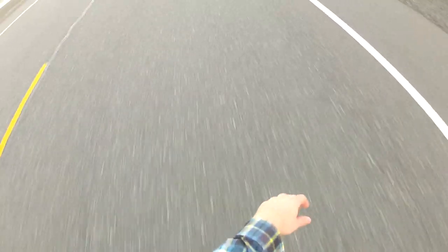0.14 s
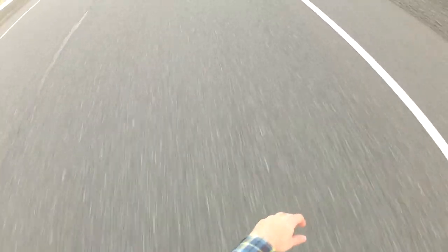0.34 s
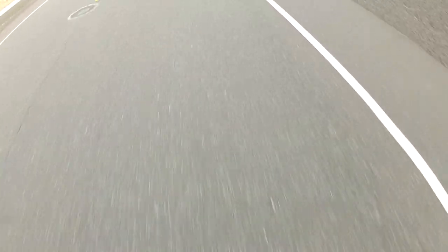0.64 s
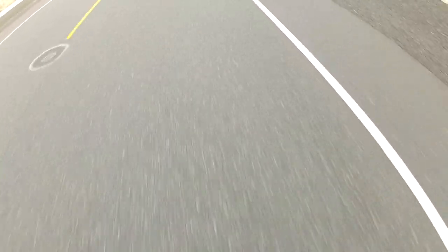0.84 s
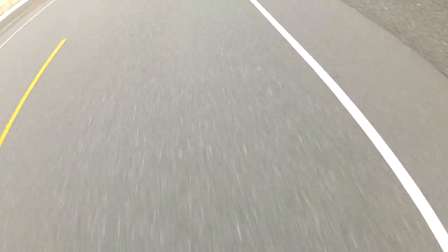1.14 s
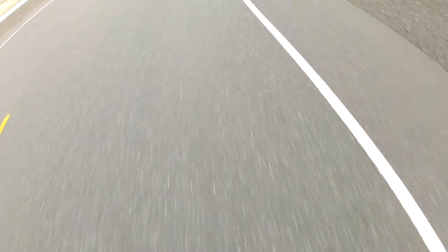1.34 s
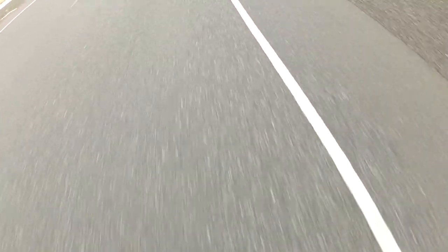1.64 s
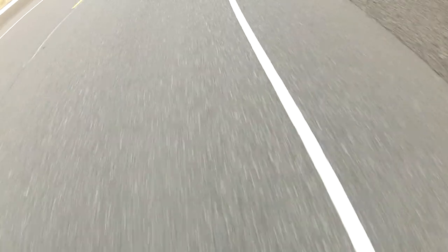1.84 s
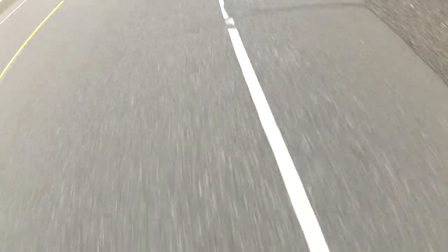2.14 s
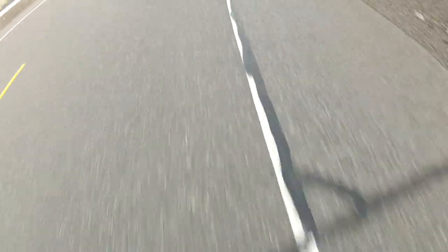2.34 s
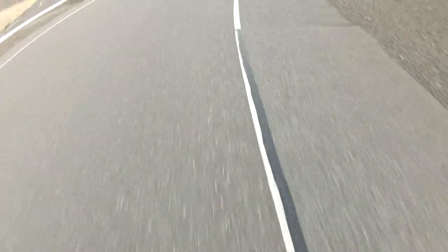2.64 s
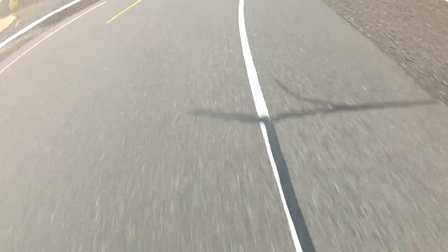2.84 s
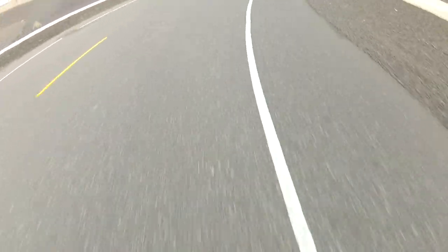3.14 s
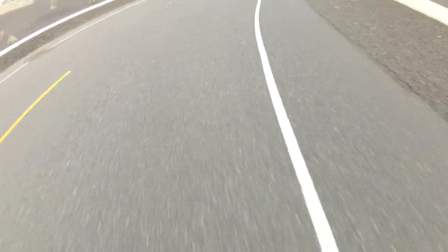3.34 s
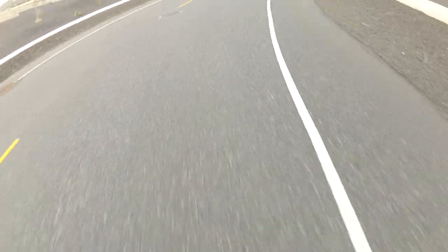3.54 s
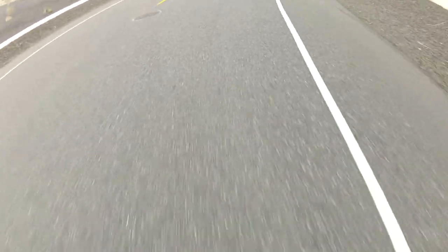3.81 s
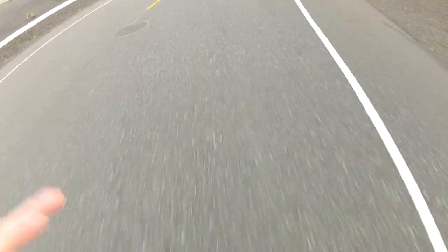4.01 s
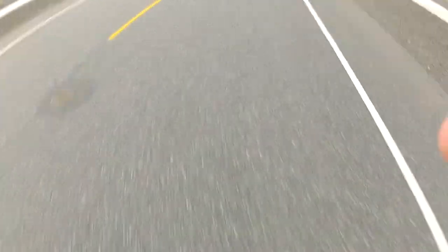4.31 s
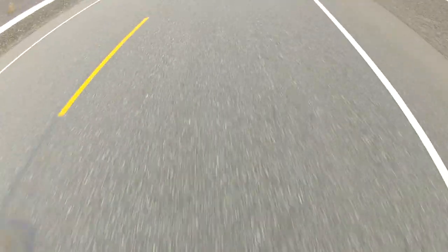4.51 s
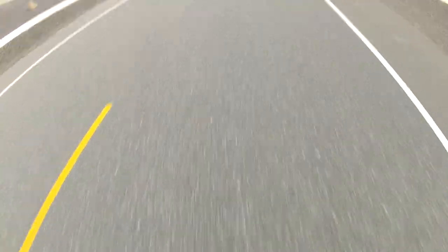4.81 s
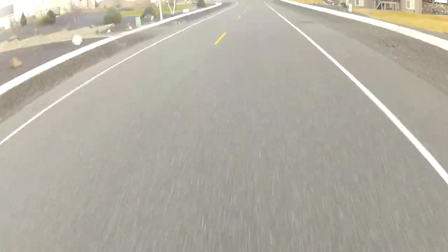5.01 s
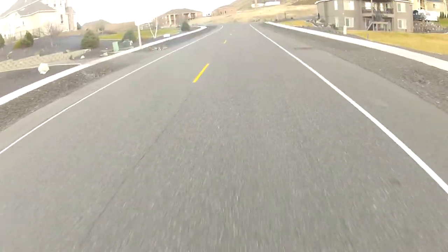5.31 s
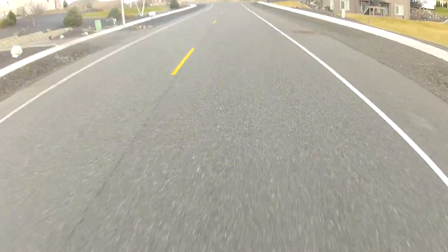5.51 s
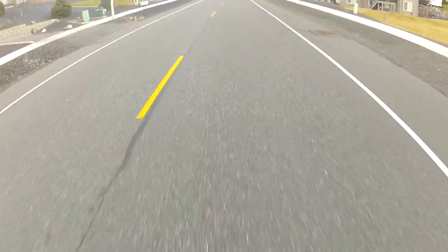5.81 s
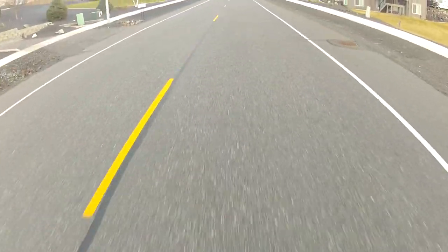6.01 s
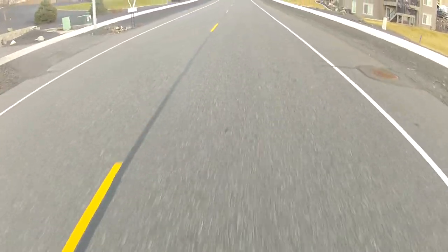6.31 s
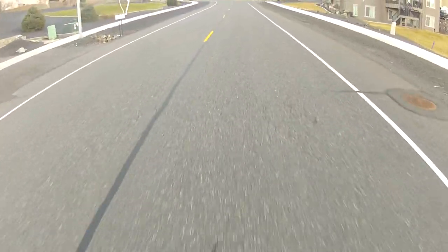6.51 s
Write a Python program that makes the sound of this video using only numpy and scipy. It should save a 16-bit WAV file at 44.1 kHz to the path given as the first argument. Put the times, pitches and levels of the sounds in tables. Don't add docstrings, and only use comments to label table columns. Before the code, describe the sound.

Heard from a small enclosed microphone carried by the rider on an open road: continuous rumbling wheels, grainy hiss and scattered dull knocks as stones hit. Later come low wind puffs and a rough roar, with sharp plastic cracks, rattles and hollow case knocks, each overload briefly pushing the rumble down. A last hard knock gives way to steadier rolling with very faint bearing squeal. The sound is boxy, distorted and low fidelity.

```python
import sys
import numpy as np
from scipy import signal
from scipy.fft import rfft, irfft
from scipy.io import wavfile
from scipy.ndimage import uniform_filter1d

SR = 44100
rng = np.random.default_rng(int(sys.argv[2]) if len(sys.argv) > 2 else 0)


def level_to_linear(level):
    exponent = np.asarray(level, float) / 20
    return 10 ** exponent


def unload_audio(sound):
    columns = np.transpose(np.atleast_2d(sound))
    steps = np.round(np.clip(columns, -1, 1) * 32767)
    wavfile.write(sys.argv[1], SR, steps.astype(np.int16))


N = 293706
T = np.arange(N) / SR


def evened(x):
    return x / np.sqrt(np.mean(x ** 2) + 1e-20)


def coloured(x, points):
    f, db = np.transpose(points)
    hz = abs(np.fft.fftfreq(8192, 1 / SR))
    curve_db = np.interp(np.log(hz + 1), np.log(f + 1), db, db[0] - 25, db[-1] - 40)
    log_gain = np.log(level_to_linear(curve_db))
    taps = np.fft.ifft(np.exp(signal.hilbert(log_gain).conj())).real[:4096]
    return evened(irfft(rfft(x) * rfft(taps, len(x)), len(x)))


def resonate(x, hz, width_hz):
    turn = np.exp(2j * np.pi * np.cumsum(hz * np.ones(len(x))) / SR)
    r = np.exp(-np.pi * width_hz / SR)
    smooth = signal.lfilter([1 - r], [1, -r], x / turn)
    return 2 * (turn * smooth).real


def flicker(low_hz, top_hz):
    rates = np.geomspace(low_hz, top_hz, num=20)
    return evened(sum(np.sin(2 * np.pi * (f * T + rng.random())) for f in rates))


def stones(per_s, spread_db):
    size = level_to_linear(spread_db * np.minimum(rng.exponential(1, N), 5))
    sign = rng.choice([-1., 1.], N)
    return size * sign * (rng.random(N) < per_s / SR)


def swells(table, rise_s, fall_s):
    power = np.zeros(N)
    for s, length, db in table:
        before, after = np.maximum(s - T, 0), np.maximum(T - s - length, 0)
        power += level_to_linear(db - 10 * before / rise_s - 10 * after / fall_s) ** 2
    return power


def add_ring(sound, s, db, hz, rise_s, t60_s):
    t, at = np.arange(SR // 20) / SR, round(s * SR)
    envelope = level_to_linear(db - 60 * t / t60_s) * np.minimum(t / rise_s, 1)
    sound[at:at + len(t)] += envelope * np.sin(2 * np.pi * hz * t)


def gusts():
    # start in seconds, length in seconds, level in dB.
    gust_rows = [(.09, 0.11, -22.5), (.63, .2, -18.5), (.97, 0.051, -21.5), (1.27, 0.027, -27),
                 (1.75, 0.42, -27.5), (2.29, .04, -26), (2.62, 0.077, -25), (3.88, 0.073, -27.5),
                 (4.43, 1, -16), (4.91, .04, -12.5), (5.045, 0.0096, -6), (5.25, .3, -7.5),
                 (5.57, 0.23, -7.5), (5.86, 0.095, -17.5), (6.37, .03, -24.5)]
    breeze = level_to_linear(-27 - 1.18 * T)
    return np.sqrt(breeze ** 2 + swells(gust_rows, rise_s=0.064, fall_s=0.049))


def ducking():
    knee_db, smooth_s = -17.5, 0.23
    wind_db = uniform_filter1d(20 * np.log10(gusts()), round(smooth_s * SR))
    return level_to_linear(-np.maximum(wind_db - knee_db, 0))


def wheels(lift):
    # frequency in Hz, level in dB.
    drum_spectrum = [(15, -21.5), (25, -12), (119, -18.5), (248, -10.5), (338, -4.5), (388, -3.5), (546, 0),
                     (637, -5), (730, -17), (928, -33.5), (1060, -44), (1500, -42.5), (1950, -56),
                     (3300, -120)]
    hiss_spectrum = [(530, -26.5), (900, -3), (1060, -17.5), (1380, -12), (1580, -29.5), (1850, -15),
                     (2280, -12), (3550, -15.5), (4620, -29.5), (5120, -31), (6000, -30), (7800, -80),
                     (13200, -120)]
    fizz_spectrum = [(1940, -24), (3300, -6.5), (3780, -7), (4470, -2.5), (4990, -3), (5580, -11.5),
                     (6000, -9), (7800, -62), (13200, -120)]
    # time in seconds, load on the wheels in dB, coarseness of the asphalt in dB.
    road = [(0, -13, 4.5), (.12, -15, 1.5), (.45, -15.5, -2), (.72, -16, -2), (1.3, -17, 0.5),
            (1.75, -16.5, 1.5), (2.1, -15, 1.5), (2.45, -14.5, 3.5), (2.7, -15.5, 1.5), (3.0, -13.5, 3.5),
            (3.4, -15, 1), (4.15, -17.5, 1), (4.36, -16, 3.5), (4.9, -15, 5.5), (5.6, -14.5, 0),
            (5.9, -15.5, -0.5), (6.15, -17, -1), (6.66, -16, 0)]
    # start in seconds, length in seconds, level in dB.
    seams = [
        (1.975, 0.13, -48),
        (2.0, .04, -48.5),
        (5.75, .04, -51),
        (5.91, 0.018, -55),
        (6.17, 0.083, -54.5),
    ]
    at, load_db, coarse_db = np.transpose(road)
    load, coarse = level_to_linear(np.interp(T, at, load_db)), level_to_linear(np.interp(T, at, coarse_db))
    duck, patches = ducking(), flicker(7.2, 90)

    drum = lift * coloured(stones(2500, 1.6) * level_to_linear(0.32 * patches), drum_spectrum)
    hiss_kicks = stones(9000, 2.8) * level_to_linear(0.31 * patches + 0.58 * flicker(6.1, 120))
    hiss = coloured(hiss_kicks, hiss_spectrum)
    fizz = coloured(stones(9000, 3.8) * level_to_linear(0.73 * flicker(5.1, 110)), fizz_spectrum)

    steady_grit = level_to_linear(-57.5) * coarse ** 0.28 * duck ** 1.5
    grit = np.sqrt(steady_grit ** 2 + swells(seams, rise_s=.04, fall_s=.025))
    tread = level_to_linear(3.5 - 48.5) * coarse * duck ** 0.17 * hiss + level_to_linear(6.5) * grit * fizz
    return level_to_linear(-0.71) * load * duck ** 0.37 * drum + tread


def jolts():
    # start in seconds, peak in dB, ring in Hz.
    large_stones = [(0.093, -10, 653), (0.459, -11.5, 652), (0.734, -9.5, 507), (1.618, -2, 570),
                    (2.097, -2.5, 532), (2.139, -11, 500), (2.344, -4, 510), (2.397, -5.5, 594),
                    (2.472, -6, 574), (2.929, -4.5, 560), (3.01, -1.5, 578), (3.243, -1.5, 540),
                    (3.486, -5, 513), (3.528, 2, 468), (5.336, -11, 450), (5.606, -6, 624),
                    (6.014, -35, 517), (6.572, -10, 610)]
    sound, lift_db = np.zeros(N), np.zeros(N)
    for s, db, hz in large_stones:
        add_ring(sound, s, db - 1.5, hz, rise_s=0.0017, t60_s=0.029)
        at = round(s * SR)
        lift_db[at - 600:at + 200] += 12 * np.hanning(800)
    return sound, level_to_linear(-lift_db)


def deck():
    grow_db, grow_s = 20, 2.5
    head_up_db, head_up_s = -4, 4.62
    db = -38.5 - grow_db * np.clip(1 - T / grow_s, 0, 1)
    db = db + head_up_db * np.clip((T - head_up_s) / .15, 0, 1)
    ring = resonate(resonate(stones(4000, 1.2), 740, 350), 740, 350)
    return level_to_linear(db - 1.5) / ducking() ** .1 * evened(ring)


def wind():
    # frequency in Hz, level in dB.
    buffet_spectrum = [(26, -39.5), (45, 1), (113, 1), (249, -2.5), (378, -10), (425, -10.5), (471, -16.5),
                       (509, -29.5), (1000, -44.5), (1300, -45.5), (2200, -120)]
    roar_spectrum = [(470, -48.5), (800, 3), (888, -5.5), (2860, -16), (3650, -51), (4210, -48),
                     (5500, -24), (7150, -72), (12100, -120)]
    gust = gusts()
    buffet = coloured(rng.standard_normal(N) * level_to_linear(1.53 * flicker(6, 40)), buffet_spectrum)
    limiter = (uniform_filter1d(buffet ** 2, size=1200) + .15) ** 0.2
    grain = stones(3000, 4.) * level_to_linear(2.5 * flicker(10, 100))
    roar = level_to_linear(-24) * gust ** 2 * coloured(grain, roar_spectrum)
    return gust * evened(buffet / limiter) + roar


def puffs():
    # start in seconds, peak in dB, swing in Hz.
    puff_rows = [
        (4.509, -4.5, 78.6),
        (4.685, -4.5, 117),
        (4.911, -3, 137),
        (5.036, 3, 113),
        (5.122, -16, 105),
        (5.337, -4, 119.5),
        (5.55, -3.5, 186),
    ]
    sound = np.zeros(N)
    for s, db, hz in puff_rows:
        bell = np.exp(-((T - s - .012) / 0.0072) ** 2)
        sound += level_to_linear(db + 1.5) * np.sin(2 * np.pi * hz * (T - s)) * bell
    return sound


def rattles():
    # start in seconds, peak in dB, ring in Hz, length in
    # ms, hardness in dB.
    ticks = [(4.3058, -9, 3900, 3.05, 2), (4.521, -18.5, 3030, 4.1, -4), (4.573, -18.5, 1940, 2.4, -9),
             (4.5897, -8.5, 2680, 1.6, -8), (4.6152, -23, 1740, 1.6, -2), (4.8186, -20.5, 1440, 2, 7),
             (4.8434, -25.5, 2180, 2.4, -6), (5.006, -23, 1950, 1.6, -2), (5.013, -7.5, 2440, 3.3, 0),
             (5.042, -16.5, 1770, 2.2, 9), (5.0714, -17, 3030, 1.4, 11), (5.0879, -24, 1500, 5, 0),
             (5.1037, -5, 3200, 1.3, 18.5), (5.15, 0, 2010, 2.25, 5.5), (5.2014, -17, 2930, 2.7, 6),
             (5.2118, -5, 3340, 1.13, 15),
             (5.354, -29, 1570, 1.8, -27), (5.3753, -31, 1620, 2.6, -11), (5.414, -44, 1560, 2.3, -4),
              (5.436, -27, 1640, 3.2, -22), (5.481, -34, 1510, 3.6, -13), (5.4987, -39, 1600, 2.9, -5),
              (5.553, -30, 1500, 2, -7), (5.5804, -30, 1550, 1.8, 1), (5.6042, -31.5, 2100, 5, -25),
              (5.617, -18, 1800, 1.2, 18), (5.66, -30.5, 2020, 3.2, -20), (5.6928, -14, 3280, 2.1, -9),
              (5.706, -24, 2800, 4, -7), (5.759, -25, 1650, 3.1, -4), (5.7767, -10.5, 3860, 1.8, 3)]
    rubs = [
        (4.4039, -13.5, 3230, 32, -1),
        (4.362, -31, 3300, 24, 6),
        (4.4035, -8.5, 3180, 5.1, 2),
        (4.436, -24.5, 1600, 12, -7),
        (4.65, -19, 1930, 9.7, -4.5),
        (4.948, -9.5, 1910, 7.2, 1),
        (4.964, -5, 3370, 8.3, 2),
    ]
    blows = [
        (4.7249, -3, 2470, 5.6, 9.5),
        (5.796, -14.5, 2800, 2.7, -15),
    ]
    grit = [
        (1.943, -33, 2740, 4.2, 8),
        (2.0346, -29.5, 3100, 3.5, 11),
        (5.914, -33, 4600, 3.2, 16),
        (5.925, -30, 4300, 2, 12),
        (6.018, -38, 2900, 6.8, 4.3),
        (6.5476, -51, 3100, 4.7, 2.2),
        (0, -20, 4200, 1.2, 15),
    ]
    # frequency in Hz, level in dB.
    case_spectrum = [(710, -9), (1200, -23.5), (2240, 19.5), (2730, 1.5), (3120, 3), (3850, -5),
                     (4460, -26), (4900, 21), (6000, 5.5), (7800, -47), (13200, -120)]
    # frequency in Hz, width in Hz, level in dB.
    case_modes = [(1106, 98, -10), (1726, 140, 6), (2800, 270, 4), (3270, 210, 2.5), (3690, 110, 2.5),
                  (4900, 76, -23)]
    sound, t = np.zeros(N), np.arange(SR // 10) / SR
    case = np.zeros(len(t))
    for k, (f, width, db) in enumerate(case_modes):
        case += (-1) ** k * level_to_linear(db) * evened(resonate(t == 0, f, width))

    for s, db, hz, ms, hard_db in ticks + rubs + blows + grit:
        release = np.maximum(t - ms / 1000, 0)
        shape = np.minimum(t / 0.00044, 1) * level_to_linear(-80 * t - 60 * release / 0.0046)
        shape = shape + 0.0034 * signal.lfilter([1], [1, -.985], shape)
        noise = rng.standard_normal(len(t))
        modes = irfft(rfft(noise) * rfft(case), len(t))
        body = .5 * coloured(noise, case_spectrum) + 1.38 * evened(modes)
        ring = resonate(resonate(noise, hz, 1400), hz, 1400)
        edge = resonate(resonate(noise[::-1], 3500, 2400), 3500, 2400)
        thump = resonate(resonate(noise, 1025, 770), 1025, 770)
        hit = .55 * evened(body * shape) + .95 * evened(ring * shape)
        hit = hit + level_to_linear(-13.5 + hard_db) * evened(edge * shape)
        hit = hit + level_to_linear(-2 - 0.67 * hard_db) * evened(thump * shape)
        hit = hit * np.sqrt(np.mean(shape ** 2))
        at = round(s * SR)
        sound[at:at + len(t)] += level_to_linear(db - 9) * hit[:N - at]
    return sound


def knocks():
    # start in seconds, peak in dB, ring in Hz.
    hollow = [
        (5.015, -6, 820),
        (5.15, -10.5, 950),
        (5.797, -1, 845),
        (5.797, -5, 1050),
    ]
    cracks = [(4.3068, 1, 1950), (4.5892, -7, 2680), (4.7256, -0.5, 2620), (4.7292, -4, 3100),
              (4.727, -5, 1500), (4.9646, -4, 3530), (4.9646, -5, 1950), (5.104, -9, 2050),
              (5.7765, -12, 3900), (5.212, -6, 3900), (5.071, -24, 3270), (5.103, 3.5, 3200),
              (5.1514, -3, 1920), (5.151, -4, 4060), (5.1512, -6, 2970), (5.2132, 0.5, 3220),
              (5.6166, -15, 3870), (5.7064, -9.5, 2950), (5.7763, -22, 1900)]
    sound = np.zeros(N)
    for s, db, hz in hollow:
        add_ring(sound, s, db + 3, hz, rise_s=.0025, t60_s=.022)
    for s, db, hz in cracks:
        add_ring(sound, s, db - 5, hz, rise_s=.0006, t60_s=.012)
    return sound


def squeal():
    # start in seconds, length in seconds, level in dB.
    squeals = [
        (5.808, .012, -39.5),
        (5.905, .03, -50),
        (5.96, 0.088, -47.5),
        (6.51, .13, -47),
    ]
    high_hz, low_hz = 4850, 3030
    slide_s, slide_length_s = 5.89, .11
    slide = np.clip((T - slide_s) / slide_length_s, 0, 1)
    smear = np.exp(-((T - slide_s - slide_length_s / 2) / slide_length_s) ** 2)
    width_hz = 240 + 400 * smear
    wobble = evened(uniform_filter1d(rng.standard_normal(N), size=60))
    pitch_hz = high_hz + (low_hz - high_hz) * slide + 0.58 * width_hz * wobble
    tone = np.sin(2 * np.pi * np.cumsum(pitch_hz) / SR)
    return tone * np.sqrt(swells(squeals, rise_s=.03, fall_s=.02))


def gain_control():
    # start in seconds, drop in dB.
    dips = [
        (4.735, 17),
        (4.975, 7),
        (5.019, 5.5),
        (5.153, 8.5),
        (5.215, 8.5),
        (5.804, 11),
    ]
    drop_db = np.zeros(N)
    for s, db in dips:
        drop_db += db * np.clip((T - s) / 0.0028, 0, 1) * np.exp(-abs(T - s) / 0.055)
    return level_to_linear(-drop_db)


def scene():
    rings, lift = jolts()
    steady = wheels(lift) + rings + deck() + wind() + puffs() + squeal()
    hits = rattles() + knocks()
    return (gain_control() * steady + hits)[None]


def top_cut(x):
    return signal.sosfilt(signal.butter(12, 16500, fs=SR, output="sos"), x)


def record(dry):
    hold_hz, edge_hz = 12000, 15350
    hz = np.fft.rfftfreq(N, 1 / SR)
    clipped = np.clip(dry, -1, 1)
    narrow = irfft(rfft(clipped) / (1 + (hz / 5650) ** 30), N)
    mirrored = narrow * (1 + 2 * np.cos(2 * np.pi * hold_hz * T))
    top = np.where(hz < edge_hz, 1, level_to_linear(-33 - (hz - edge_hz) * .012))
    held = irfft(rfft(mirrored) * np.sinc(hz / hold_hz) * top, N)
    return top_cut(np.clip(held, -1, 1))


dry = scene()
out = record(dry)
unload_audio(out)
```